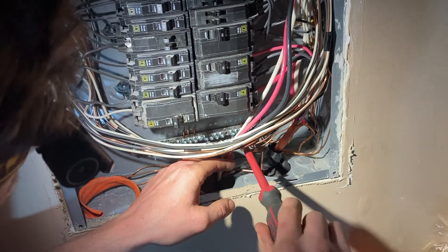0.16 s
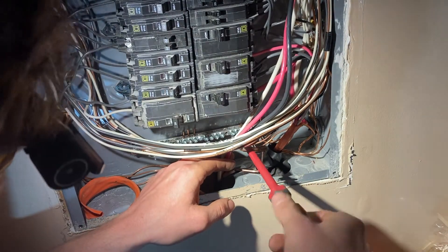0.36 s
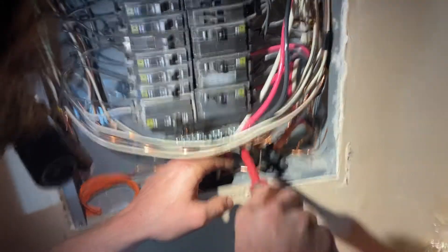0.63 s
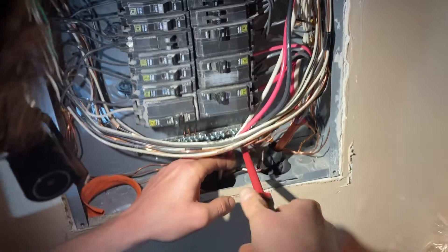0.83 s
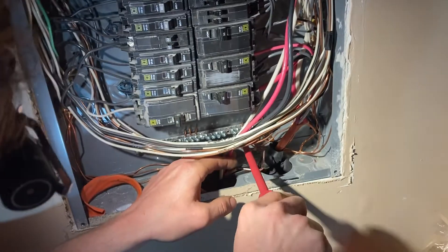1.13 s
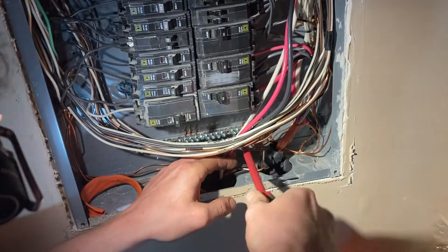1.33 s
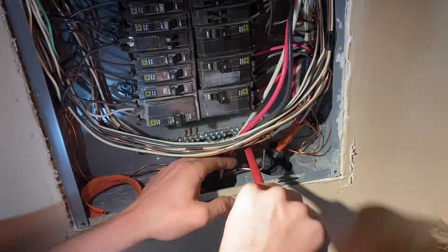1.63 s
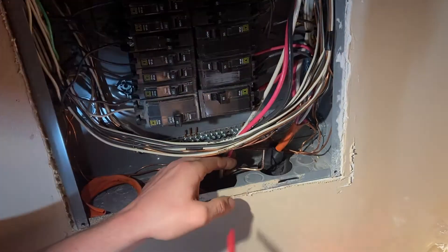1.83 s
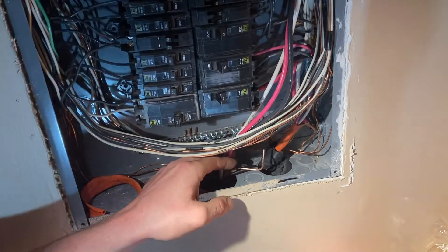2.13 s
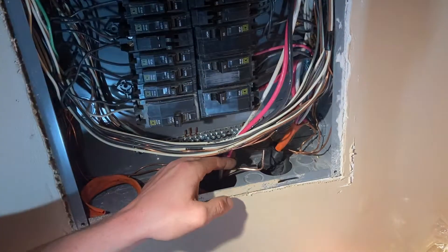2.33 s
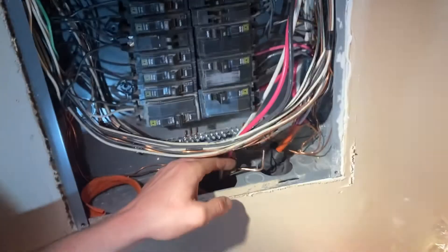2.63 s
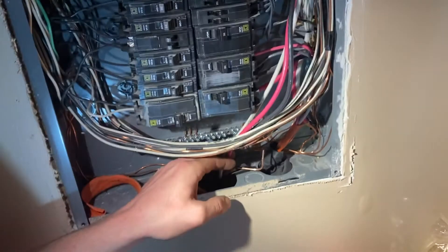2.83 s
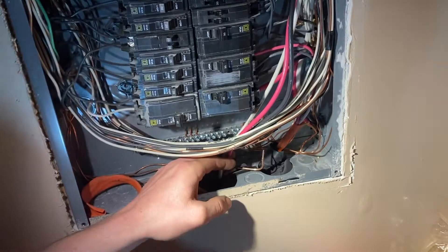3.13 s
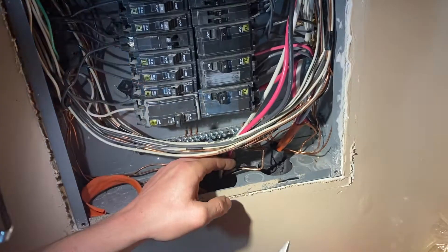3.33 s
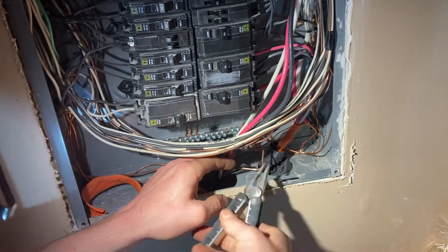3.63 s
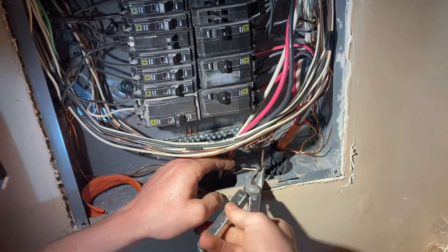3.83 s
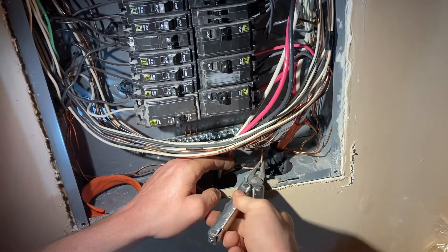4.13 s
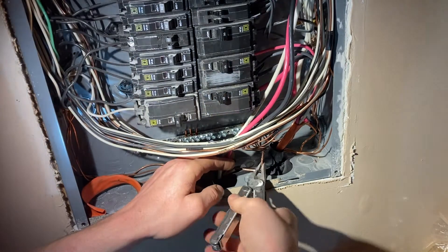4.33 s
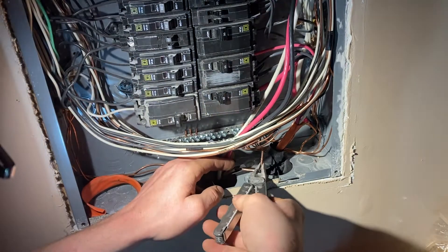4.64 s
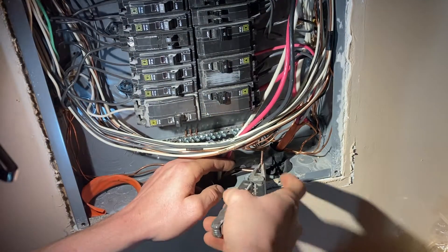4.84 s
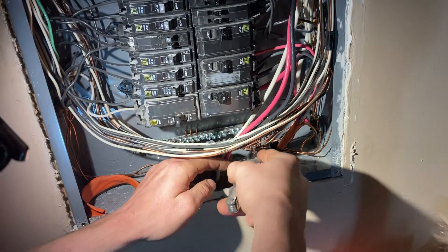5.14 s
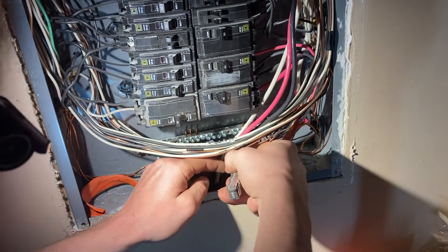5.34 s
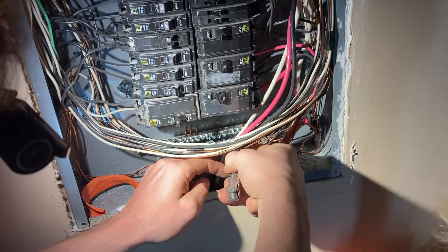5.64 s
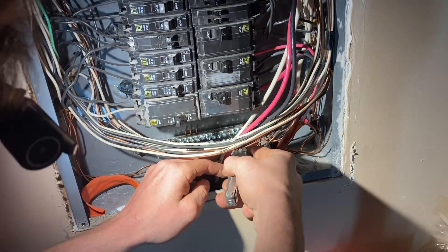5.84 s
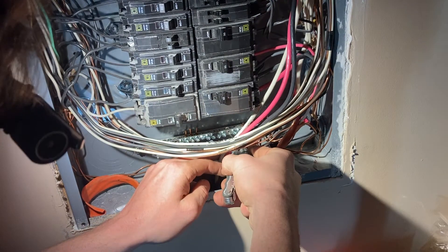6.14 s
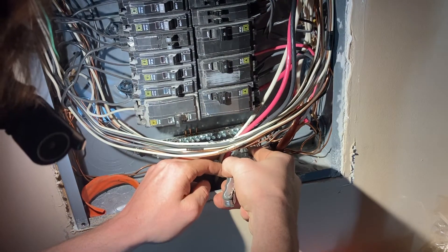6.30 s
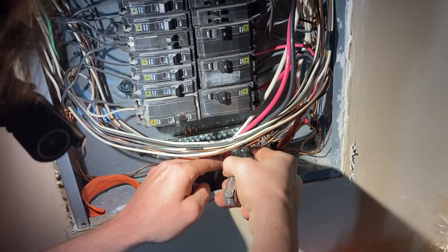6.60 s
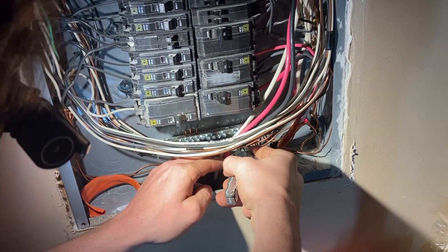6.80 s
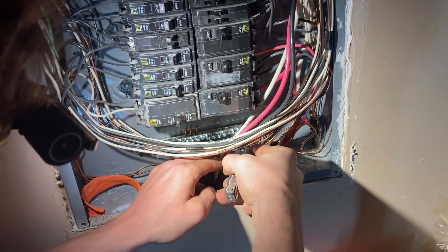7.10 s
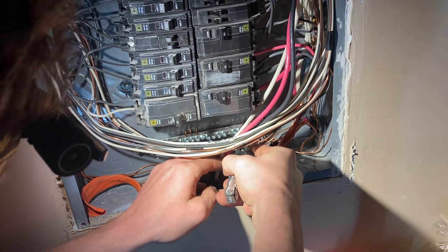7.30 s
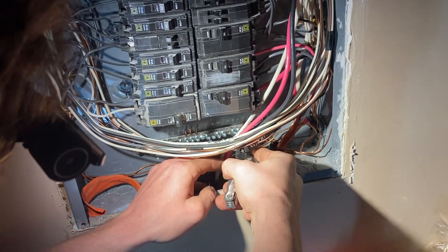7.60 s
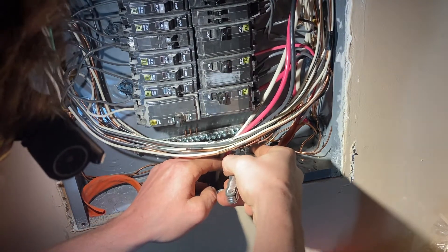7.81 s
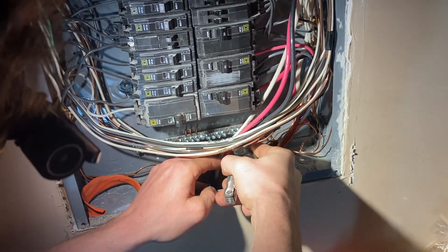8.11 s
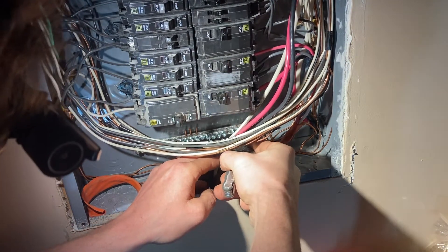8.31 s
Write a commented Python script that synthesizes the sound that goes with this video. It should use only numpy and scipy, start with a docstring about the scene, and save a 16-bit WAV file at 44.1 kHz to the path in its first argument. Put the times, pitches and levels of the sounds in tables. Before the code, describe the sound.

A screwdriver squeaks a tight screw in a steel electrical box, drops with a hollow thump, then pliers clink, knock and scrape on wire.

```python
"""Tools in a steel breaker box

A screwdriver turns a squeaking terminal screw and knocks the box; it is put down and pliers clink as they are
picked up, then they grip and bend a stiff wire that scrapes and clicks. The hollow wall booms under the hands.
Metal contacts and slides are noise shaped by resonances; thuds, squeaks and jaw rings are built from sines.
A small room answers, quiet air lies underneath, and two close, spaced microphones hear it all."""
import sys
import numpy as np
from scipy import signal
from scipy.fft import rfft, irfft, next_fast_len
from scipy.io import wavfile
from scipy.ndimage import map_coordinates

SR = 44100
rng = np.random.default_rng(int(sys.argv[2]) if len(sys.argv) > 2 else 0)


def dump(signal):
    """Clip the signal to [-1, 1] and save it as 16-bit WAV at the path in sys.argv[1]."""
    limited = np.clip(np.atleast_2d(signal).T, -1, 1)
    pcm = np.round(limited * 32767).astype(np.int16)
    wavfile.write(sys.argv[1], SR, pcm)


N = 373086
T = np.arange(SR // 4) / SR  # the life of one blow, in seconds


def amp(db):
    """Decibels to gain."""
    return 10 ** (np.asarray(db) / 20)


def unit(x):
    """The signal scaled to rms 1."""
    return x / np.sqrt(np.mean(x ** 2) + 1e-20)


def along(points, hz):
    """(frequency, value) points read on a logarithmic frequency axis."""
    f, v = np.transpose(points)
    return np.interp(np.log(hz + 1), np.log(f + 1), v)


def wobble(rate, size=N):
    """A smooth random curve with rate knots a second."""
    knots = rng.standard_normal(int(size * rate / SR) + 4)
    return map_coordinates(knots, [np.arange(size) * rate / SR], order=2)


def filtered(x, response):
    """The signal through a response given as a function of frequency."""
    n = x.shape[-1]
    padded = next_fast_len(n + n // 20, real=True)
    spectrum = rfft(x, padded) * response(np.fft.rfftfreq(padded, 1 / SR))
    return irfft(spectrum, padded)[..., :n]


def colour(points):
    """The response of a (frequency, level in dB) spectrum."""
    return lambda f: amp(along(points, f))


def body(modes):
    """The magnitude response of overlapping resonances, steep enough to leave dark valleys between them."""
    f = np.arange(0, SR / 2, 2)
    power = 0
    for centre, width, db in modes:
        damping = (f * width) ** 2
        resonance = damping / ((centre * centre - f * f) ** 2 + damping)
        power = power + amp(2 * db) * resonance ** 1.5
    return lambda hz: np.interp(hz, f, np.sqrt(power))


# how alike the two microphones hear a noise: (frequency [Hz], left-right likeness [-1 to 1])
LIKENESS = [(100, 0.99), (280, 0.73), (600, 0.71), (1500, 0.52), (3000, 0.02), (5800, 0.05), (7000, 1),
            (10000, .93)]


def noise(response, size=N):
    """Coloured stereo noise of rms 1: the balance of mid and side sets how alike the microphones hear it."""
    def mid_side(f):
        turn = np.arccos(np.clip(along(LIKENESS, f), -1, 1)) / 2
        return response(f) * np.array([np.cos(turn), np.sin(turn)])

    mid, side = filtered(rng.standard_normal((2, size)), mid_side)
    return unit(np.array([mid + side, mid - side]))


def struck(response):
    """The vibration after one blow: each contact spot favours different ones among many close modes."""
    knots = np.arange(0, SR / 2, 110)
    gain_db = 4 * rng.standard_normal(len(knots))

    def uneven(f):
        # the unevenness shrinks towards the bass
        return response(f) * amp(np.interp(f, knots, gain_db) * np.minimum(f / 900, 1))

    return noise(uneven, size=len(T))


def blow(field, db, rise, t60):
    """A vibration that swells and dies away, db being its rms at the top."""
    shape = (1 - np.exp(-T / rise)) * amp(-60 * T / t60)
    shape /= shape.max()
    return amp(db) * unit(field * shape) * np.sqrt(np.mean(shape ** 2))


def add(track, s, sound):
    """Mix a sound into the track at time s, cut off at the track's end."""
    part = track[:, round(s * SR):][:, :sound.shape[-1]]
    part += sound[..., :part.shape[-1]]


def stroke(s, length, attack, release_db_per_s):
    """The gain of a movement that starts at s, builds up, holds until its length is over and dies away."""
    t = np.arange(round((length + .4) * SR)) / SR
    build = np.sin(np.pi / 2 * np.minimum(t / attack, 1)) ** 2
    release = amp(-release_db_per_s * np.maximum(t - length, 0))
    gain = np.zeros((1, N))
    add(gain, max(s, 0), build * release)
    return gain[0]


# spectrum of the still air: (frequency [Hz], relative level [dB])
AIR_SPECTRUM = [(20, -24), (55, -3), (150, -10.5), (400, -18.5), (1000, -25.5), (3000, -31.5), (8000, -38),
                (12000, -46.5), (16000, -67.5)]


def air():
    """Steady, quiet background noise, strongest in the bass."""
    return amp(-71.5) * noise(colour(AIR_SPECTRUM))


# hands shove against the wall: (time [s], length [s], boom before trim [dB])
WALL_PUSHES = [(0.0, 0.15, -47), (0.24, 0.058, -54), (0.47, .21, -43), (0.712, .14, -49),
               (0.907, 0.074, -43.5), (1.2, 0.071, -55.5), (1.374, .05, -45), (1.583, 0.069, -46.5),
               (1.693, 0.062, -51.5), (2.204, 0.16, -63.5), (2.39, .11, -25), (2.58, .18, -39.5),
               (2.818, .07, -43.5), (3.75, .05, -53), (3.985, .04, -44), (4.22, 0.062, -56.5),
               (4.896, .06, -57.5), (5.12, 0.0514, -44), (5.252, 0.055, -38.5), (5.523, 0.073, -45),
               (5.74, 0.083, -58), (5.947, 0.064, -57.5), (6.316, 0.057, -49), (6.529, 0.054, -37.5),
               (6.622, 0.06, -51), (7.112, 0.11, -59), (7.401, 0.087, -35.5), (7.544, .13, -38),
               (7.86, .12, -36.5), (8.08, 0.23, -47), (8.368, 0.14, -38)]
# spectrum of the wall's low swing: (frequency [Hz], relative level [dB per Hz])
WALL_SPECTRUM = [(20, -40), (36, -22), (48, -6.5), (56, -8), (66, -7), (85, -20), (150, -42.5),
                 (300, -75.5)]
PUSH_ATTACK_S, PUSH_RELEASE_DB_PER_S = 0.014, 190.5


def wall(boom_db=-1):
    """The hollow wall swings around its lowest resonance each time the hands push on it."""
    load = 0
    for s, length, db in WALL_PUSHES:
        load = load + amp(db) * stroke(s, length, PUSH_ATTACK_S, PUSH_RELEASE_DB_PER_S)
    swing = noise(colour(WALL_SPECTRUM))
    size = np.abs(signal.hilbert(swing[0])) + 0.11
    return amp(boom_db) * load * unit(swing / size)  # dividing by its size evens out the swing


# tool and wire slide on each other and on the box, levels before trims:
# (time [s], length [s], scrape [dB], grit [dB], rub [dB])
METAL_SLIDES = [(0.0, 0.11, -62, -64, -58), (0.257, 0.13, -62.5, -65.5, -57.5),
                (0.487, 0.28, -60, -60, -53), (0.695, 0.072, -59.5, -67.5, -48),
                (0.785, .2, -64.5, -70, -51), (1.08, 0.28, -64, -68, -59), (1.334, .16, -62, -67, -59),
                (1.6, 0.21, -67.5, -74, -61), (2.25, .1, -76, -83.5, -67.5),
                (2.521, .28, -63.5, -59.5, -58), (2.829, 0.19, -75, -69.5, -68),
                (3.697, 0.11, -90, -93, -62), (3.731, 0.0098, -47.5, -50.5, -48.5),
                (3.901, 0.26, -53, -70, -48), (4.197, 0.016, -42.5, -63.5, -52),
                (4.265, .06, -88, -85, -61), (4.475, 0.028, -74, -98, -60),
                (4.75, 0.028, -59.5, -68, -54.5), (4.798, 0.068, -60.5, -72.5, -50.5),
                (4.92, 0.3, -71, -82.5, -61.5), (5.166, 0.046, -64.5, -62.5, -56),
                (5.282, 0.036, -54.5, -65.5, -58), (5.32, 0.031, -47.5, -70, -47.5),
                (5.388, 0.054, -66, -71, -54), (5.57, 0.083, -82.5, -89, -58.5),
                (5.676, .05, -66.5, -60, -67.5), (5.723, 0.029, -46, -70, -42.5),
                (5.793, 0.045, -96, -99, -57), (5.938, 0.031, -71, -81, -56.5),
                (6.115, 0.057, -70, -90, -63), (6.301, 0.044, -72, -92, -57.5),
                (6.454, 0.034, -68.5, -71.5, -69), (7.391, 0.097, -52, -64.5, -45),
                (7.524, 0.075, -50.5, -61.5, -39.5), (7.883, 0.22, -67, -68, -53.5),
                (8.096, 0.3, -60.5, -68, -51), (8.357, 0.034, -59, -64.5, -44),
                (8.44, 0.033, -70, -72, -50)]
# resonances of the wire held in the pliers against the box: (centre [Hz], width [Hz], level [dB])
WIRE_MODES = [(437.7, 100, 4.5), (693, 28, 8), (806, 44, 3), (942, 78, 6.5), (1149, 150, 1), (1306, 31, 1),
              (1627, 150, -6), (1900, 200, -3), (2359, 40, -6.5), (2994, 330, -12), (4130, 68, -14)]
# spectrum of the gritty slip: (frequency [Hz], relative level [dB per Hz])
GRIT_SPECTRUM = [(400, -7), (900, -12), (2000, -5.5), (4000, 0.5), (8000, -6), (11000, -6), (15500, -21.5)]
# the box's bending modes, for rubs and knocks: (centre [Hz], width [Hz], level [dB])
BOX_MODES = [(120, 100, -7.5), (161, 37, 3.5), (202.3, 10, -11), (279.6, 31, 1), (350, 39, -13),
             (424, 28, -9.5), (563, 25, -11)]
SLIDE_ATTACK_S, SLIDE_RELEASE_DB_PER_S = 0.011, 331.5


def drags(scrape_db=-1, grit_db=-1, rub_db=-1, slip_db=5, clump_db=3):
    """Dragging metal catches in tiny slips that excite the wire, while a smoother rub excites the box."""
    force = np.zeros((3, N))  # scrape, grit, rub
    for s, length, *levels in METAL_SLIDES:
        force += amp(levels)[:, None] * stroke(s, length, SLIDE_ATTACK_S, SLIDE_RELEASE_DB_PER_S)
    fine_db = slip_db * np.minimum(wobble(380), 2)
    clumps_db = clump_db * np.minimum(wobble(70), 2)
    slips = unit(amp(fine_db + clumps_db))
    scrape = amp(scrape_db) * slips * noise(body(WIRE_MODES))
    grit = amp(grit_db) * slips * noise(colour(GRIT_SPECTRUM))
    rub = amp(rub_db) * noise(body(BOX_MODES))
    return force[0] * scrape + force[1] * grit + force[2] * rub


# spectrum of a metal snap, also the rasp of the screech: (frequency [Hz], relative level [dB per Hz])
SNAP_SPECTRUM = [(500, -29.5), (1500, -11.5), (2800, 0.5), (4300, -1), (5400, -0.5), (6500, -2), (8300, -1),
                 (10500, -1.5), (12500, -10.5), (15500, -20), (17000, -42)]
# the many weak modes between the strong ones: (frequency [Hz], relative level [dB])
DENSE_MODES = [(150, -30), (400, -2.5), (900, 0), (2500, -3.5), (5000, -7.5), (9000, -30)]


def contacts(rows, modes, snap_db, clank_db, dense_db, knock_db, knock_rise, knock_t60,
             snap_rise=.004, clank_rise=0.0023, snap_life=0.83, clank_life=1.3, rattle_db=5):
    """Each contact chatters for a moment, rings the metal and sets the box swelling into a knock."""
    out = np.zeros((2, N))
    strong, box = body(modes), body(BOX_MODES)
    for s, snap, clank, knock, tilt_db, t60 in rows:
        rattle = amp(rattle_db * wobble(400, size=len(T)) * np.exp(-T / .025))

        def metal(f):
            octaves = np.log2(np.clip(f, 500, 4000) / 1500)  # positive tilt brightens the clank
            return (strong(f) + amp(dense_db + along(DENSE_MODES, f))) * amp(tilt_db * octaves)

        snap_field = struck(colour(SNAP_SPECTRUM)) * rattle
        clank_field = struck(metal) * rattle
        add(out, s, blow(snap_field, snap + snap_db, snap_rise, t60 * snap_life))
        add(out, s, blow(clank_field, clank + clank_db, clank_rise, t60 * clank_life))
        add(out, s, blow(struck(box), knock + knock_db, knock_rise, knock_t60))
    return out


# the screwdriver knocks the box and is put down, levels before trims:
# (time [s], snap [dB], clank [dB], knock [dB], clank tilt [dB per octave])
DRIVER_HITS = [(0.2056, -36, -53, -56, 1), (0.216, -33, -37.5, -35.5, -1.5), (0.4429, -47, -48, -40.5, 0),
               (0.472, -23, -39, -40, 3), (0.5736, -26.5, -43.5, -49, 0.5), (0.66, -50.5, -22.5, -28, -7),
               (0.6848, -35, -38.5, -34, -3.5), (0.8703, -43.5, -45, -47, 1),
               (0.9104, -21, -36, -48.5, 2.5), (1.0332, -19, -43, -57.5, 3.5),
               (1.1575, -42.5, -39.5, -38.5, -1), (1.3217, -41.5, -40, -41.5, 0),
               (1.3564, -15, -35, -46.5, 3), (1.452, -19.5, -37.5, -59.5, 4),
               (1.5821, -46.5, -49.5, -47.5, -3), (1.7221, -3.5, -15.5, -32, 2),
               (2.359, -30.5, -22.5, -20.5, -7.5), (2.378, -3.5, -20, -14.5, 1),
               (2.4183, -16.5, -33, -25.5, 1), (2.4445, -15, -27.5, -21, 2.5),
               (2.5783, -63, -47.5, -32, 0.5), (2.6599, -30, -33.5, -19.5, -6),
               (2.846, -75, -56, -30.5, -12.5)]
# resonances of the box's thin walls: (centre [Hz], width [Hz], level [dB])
SHEET_MODES = [(605, 56, -7.5), (649, 85, 5.5), (847, 100, 6.5), (956, 40, 10), (1130, 140, -7),
               (1243, 120, 5), (1510, 120, 1.5), (1827, 210, -3), (2240, 50, -1), (2470, 34, 2),
               (3140, 150, -11.5)]


def driver_knocks(t60=0.077):
    """The screwdriver's contacts ring the thin sheet walls, all with the same base decay in seconds."""
    rows = [(*row, t60) for row in DRIVER_HITS]
    return contacts(rows, SHEET_MODES, snap_db=-11.5, clank_db=-2.0, dense_db=-4,
                    knock_db=-1, knock_rise=0.0045, knock_t60=0.14)


# the screw binds at each turn, whistles, then screeches: (time [s], whistle length [s], screech length [s],
# whistle starting pitch [Hz], initial screech fall [Hz per s], whistle [dB], screech [dB])
SCREW_TURNS = [(0.58, .006, .016, 9300, 25000, -60, -44), (0.951, .036, .045, 10060, 17000, -21, -28),
               (1.357, .047, .047, 9750, 19000, -22, -26)]
# lines of the screech from the lowest up, the third on the whistle's pitch: relative level [dB]
SCREECH_LINES = [-8, -1, 2.5, -6, -8.5]
WHISTLE_SAG_HZ_PER_S, WHISTLE_FADE_DB_PER_S = 5300, 171
SCREECH_HZ, FALL_SPEEDUP_S = 8700, 0.05  # where the screech starts; when its mean rate of fall has doubled
SIDEBAND_SHARE = .317  # the rate of the chatter over the pitch
SQUEAK_ATTACK_S, SQUEAK_RELEASE_DB_PER_S = .004, 1097.5


def squeaks(rasp_db=-13, jitter=.022, whistle_waver=.15):
    """Stick and slip: a sagging whistle breaks into a falling screech whose chatter puts sidebands around it."""
    t = np.arange(N) / SR
    unsteady = jitter * (wobble(1100) + wobble(150) / 2)
    partials = [amp(level + 2.5 * wobble(200)) for level in SCREECH_LINES]
    breaks = amp(2.2 * wobble(900) + 1.5 * wobble(200))
    flutter = amp(2.5 * wobble(160))
    rasp = amp(rasp_db) * noise(colour(SNAP_SPECTRUM))
    out = np.zeros((2, N))
    for s, whistle_s, screech_s, hz, fall, whistle_db, screech_db in SCREW_TURNS:
        age = np.clip(t - s, 0, whistle_s)
        broken = np.clip(t - s - whistle_s, 0, 2 * screech_s)  # time since the whistle broke
        chatter = np.minimum(broken / SQUEAK_ATTACK_S, 1)
        whistle_hz = hz - WHISTLE_SAG_HZ_PER_S * age
        screech_hz = SCREECH_HZ - fall * broken * (1 + broken / FALL_SPEEDUP_S)
        pitch = (1 - chatter) * whistle_hz + chatter * screech_hz
        rough = chatter * (.5 + broken / screech_s)  # the screech coarsens as it falls
        phase = 2 * np.pi * np.cumsum(pitch * (1 + (whistle_waver + rough) * unsteady)) / SR
        whistle = amp(whistle_db - WHISTLE_FADE_DB_PER_S * age) * flutter * np.sin(phase)
        lines = sum(gain * np.sin((1 + k * SIDEBAND_SHARE) * phase) for k, gain in enumerate(partials, -2))
        screech = amp(screech_db) * breaks * (lines + rough * rasp)
        out += stroke(s, whistle_s, SQUEAK_ATTACK_S, SQUEAK_RELEASE_DB_PER_S) * whistle
        out += stroke(s + whistle_s, screech_s, SQUEAK_ATTACK_S, SQUEAK_RELEASE_DB_PER_S) * screech
    return out


# blows on a flexing surface:
# (time [s], level before the envelope [dB], settled pitch [Hz], t60 before the choke [s])
SURFACE_BLOWS = [(0.66, -17.5, 225.5, 0.046), (1.234, -44, 272, 0.37), (1.731, -10.5, 246, .2),
                 (2.021, -57.5, 196.6, 0.11), (2.183, -48.5, 164.6, 0.085), (2.36, -10, 198, 0.13),
                 (2.382, -13, 91.7, 0.17), (2.448, -6.5, 100.5, 0.13), (2.558, -22.5, 108.1, 0.64),
                 (2.663, -11.5, 154.7, 0.12), (2.846, -16, 188, 0.069), (3.631, -45, 153.8, 0.18),
                 (3.75, -24.5, 264.6, 0.26), (5.127, -38.5, 157.4, 0.17), (5.958, -50.5, 182, 0.1),
                 (7.139, -51.5, 183.8, 0.21), (7.304, -54, 225, 0.12), (7.529, -28.5, 159.4, 0.21),
                 (7.570, -21, 163.7, 0.21)]


def thuds(stretch=.17, settle=0.044, upper_db=-16, upper_ratio=1.9, rise=0.0016, choke_s=.085,
          port_radians=0.31, port_hz=260):
    """A push stiffens the surface, so its pitch starts high and settles; the resting hand chokes the swing."""
    out = np.zeros((2, N))
    for s, db, hz, t60 in SURFACE_BLOWS:
        phase = 2 * np.pi * np.cumsum(hz * (1 + stretch * np.exp(-T / settle))) / SR
        # higher swings reach the two microphone ports more out of step
        phase = phase + np.array([[.5], [-.5]]) * port_radians * (hz / port_hz) ** 2
        swing = np.sin(phase) + amp(upper_db) * np.sin(upper_ratio * phase)
        choke = np.exp(-(T / choke_s) ** 2)
        add(out, s, amp(db - 60 * T / t60) * (1 - np.exp(-T / rise)) ** 2 * choke * swing)
    return out


# steel modes of the jaws: (frequency [Hz], mean level [dB], t60 before the hand's damping [s])
JAW_MODES = [(2840, -2, 0.051), (3300, -2.5, 0.095), (3660, -23, 0.09), (4230, -8, 0.099), (4660, -34, 0.9),
             (5440, -17.5, 0.099), (6756, -17, 0.24), (12320, -9, 0.05)]


def ring(modes, spread_db=3):
    """Steel modes damped by the hand, struck at new strengths, with a new phase at each microphone."""
    held = amp(-60 * T / .25)
    total = 0
    for hz, db, t60 in modes:
        decay = amp(db + rng.normal(0, spread_db) - 60 * T / t60)
        total = total + decay * np.sin(2 * np.pi * (hz * T + rng.random((2, 1))))
    return held * total


# the loose jaws of the pliers clink: (time [s], level before trims [dB], rise [s])
JAW_CLINKS = [(2.6179, -20, 0.0027), (2.9786, -39, 0.0015), (3.1722, -15.5, 0.0012),
              (3.4146, -31.5, 0.0013)]
# spectrum of the jaws' tick: (frequency [Hz], relative level [dB per Hz])
JAW_TICK_SPECTRUM = [(470, -60), (800, -42), (990, -30.5), (1970, -24), (3140, -19.5), (3980, -0.5),
                     (7170, -23), (8660, -22.5), (11700, -18), (16000, -24)]


def clinks(tick_db=-9, tick_t60=0.064, ring_db=-21):
    """The jaws tick together and their steel rings briefly."""
    out = np.zeros((2, N))
    for s, db, rise in JAW_CLINKS:
        tick = blow(struck(colour(JAW_TICK_SPECTRUM)), db + tick_db, rise, tick_t60)
        steel = amp(db + ring_db) * (1 - np.exp(-T / rise)) * ring(JAW_MODES)
        add(out, s, tick + steel)
    return out


# the jaws catch on the wire, levels before trims:
# (time [s], snap [dB], clank [dB], knock [dB], clank tilt [dB per octave], base t60 [s])
WIRE_CATCHES = [(3.1134, -43, -64.5, -69, -3, 0.069), (4.9569, -42, -60, -67, 8, 0.058),
                (5.228, -27, -51.5, -37, 2, .035), (5.325, -56, -44.5, -52, 1, .05),
                (5.3775, -68, -47.5, -49, -5, 0.069), (5.4026, -37, -62, -44, -13, 0.046),
                (5.5139, -40.5, -46.5, -37.5, -1, 0.061), (5.759, -52.5, -42.5, -48, 2, 0.027),
                (6.1274, -62.5, -58, -51, 6, 0.032), (6.5197, -42, -44.5, -46.5, 0, 0.059),
                (6.6107, -37.5, -47, -41.5, 2.5, 0.052), (7.4091, -43, -36.5, -46.5, 1, 0.068),
                (7.4418, -31, -45, -34.5, -6, 0.043), (7.5214, -30, -32.5, -31.5, 1, 0.092),
                (7.5403, -26.5, -34.5, -33, -2, 0.087), (7.5642, -27.5, -35.5, -18.5, -10, 0.062),
                (7.855, -26.5, -35.5, -35, 4, 0.088), (7.8837, -40, -34.5, -30, -2, .034),
                (7.982, -44, -52.5, -53, 0.5, 0.035), (8.0745, -33.5, -41, -41, 0, 0.097),
                (8.2677, -61, -44.5, -40, -5, 0.058), (8.331, -42, -42.5, -40, 2, 0.077),
                (8.372, -53, -45.5, -45, -0.5, 0.056)]


def wire_grips():
    """Catching jaws excite the wire's modes with a soft, slow rise."""
    return contacts(WIRE_CATCHES, WIRE_MODES, snap_db=-11.5, clank_db=-2.5, dense_db=-18,
                    knock_db=-4.5, knock_rise=0.01579, knock_t60=0.13, snap_rise=0.0065, clank_rise=0.023)


# the pliers knock against the box, levels before trims:
# (time [s], snap [dB], clank [dB], knock [dB], clank tilt [dB per octave], base t60 [s])
PLIER_HITS = [(3.7455, -13.5, -20.5, -36, 2.5, 0.069), (3.8876, -63, -43.5, -61.5, 0.5, .1),
              (3.9715, -28.5, -33, -44.5, -1.5, 0.0514), (3.9805, -27.5, -24, -32.5, -3, 0.082),
              (4.0407, -27, -42.5, -70.5, 1.5, 0.038), (4.0706, -26.5, -29.5, -41, 4.5, 0.056),
              (4.2045, -42.5, -33.5, -38, -6, 0.041), (4.2842, -62, -59, -41.5, -11, .04)]
# resonances of the pliers pressed on the box's rim: (centre [Hz], width [Hz], level [dB])
PLIER_MODES = [(287.3, 11, 18), (431, 48, 16.5), (676, 90, 1.5), (1270, 120, -20.5), (1490, 100, -1.5),
               (2060, 185, -6), (2570, 140, 0), (2934, 41.9, -5.5), (3240, 130, -6.5), (3605, 120, -5),
               (4300, 48, -17.5), (5370, 17, -4)]


def plier_knocks():
    """The pliers' contacts ring the modes of the tool pressed on the rim."""
    return contacts(PLIER_HITS, PLIER_MODES, snap_db=-13.5, clank_db=0.5, dense_db=-9.5,
                    knock_db=-2.0, knock_rise=0.0054, knock_t60=0.18)


# decay of the small room: (frequency [Hz], t60 [s])
ROOM_DECAY = [(100, 0.34), (300, 0.25), (1000, 0.27), (3000, .44), (7000, 0.38), (11000, 0.38),
              (16000, 0.72)]


def room(x, build=0.0057):
    """A diffuse noise tail in which each frequency dies at its own speed."""
    hz, t, bins = signal.stft(noise(np.ones_like, size=SR * 2 // 3), SR, nperseg=256)
    decay = amp(-60 * t / along(ROOM_DECAY, hz)[:, None])
    tail = signal.istft(bins * decay * (1 - np.exp(-t / build)), SR, nperseg=256)[1]
    return signal.fftconvolve(x, tail / np.linalg.norm(tail[0]), axes=1)[:, :N]


def scene():
    """The tools, the box and the wall in a quiet room."""
    steel = driver_knocks() + plier_knocks() + wire_grips() + drags()
    clink, thud, squeak = clinks(), thuds(), squeaks()
    sent = amp(-10.5) * steel[0] + amp(-12.5) * clink[0] + amp(-6.5) * thud[0] + amp(-13.0) * squeak[0]
    return steel + clink + thud + squeak + room(sent[None]) + wall() + air()


# level difference of the ports: (frequency [Hz], left minus right [dB])
PORT_BALANCE = [(60, -1.58), (250, -1.56), (550, 2.5), (2000, 2.5), (3600, 1), (6000, -0.5), (9000, 0)]
# phase by which the left port leads: (frequency [Hz], lead [radians])
PORT_LEAD = [(100, 0.049), (320, 0.034), (1500, .2), (3000, .9), (6000, 1.0), (7000, 0)]
TOP_HZ = 16300  # nothing passes from here up


def record(dry, shade_hz=7000, lag=.00023, low_cut_hz=36):
    """Two spaced ports: the left leads in the middle range and lags in the high treble; both ends are cut."""
    sides = np.array([[.5], [-.5]])

    def response(f):
        lead = along(PORT_LEAD, f) - 2 * np.pi * lag * np.maximum(f - shade_hz, 0)
        ports = amp(sides * along(PORT_BALANCE, f)) * np.exp(1j * sides * lead)
        low_cut = 1 / np.sqrt(1 + (low_cut_hz / (f + 1)) ** 8)
        return ports * low_cut * (f < TOP_HZ)

    return filtered(dry, response)


dry = scene()
out = record(dry)
dump(out)
```